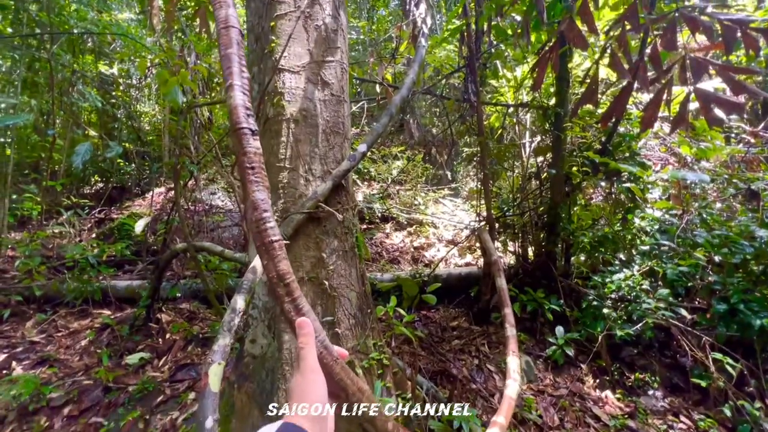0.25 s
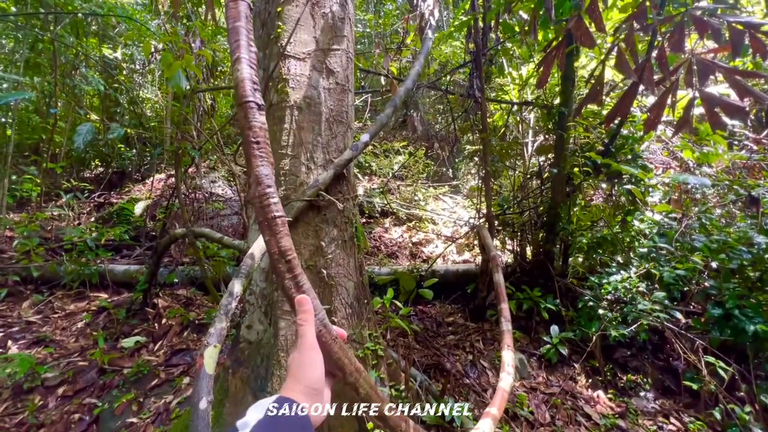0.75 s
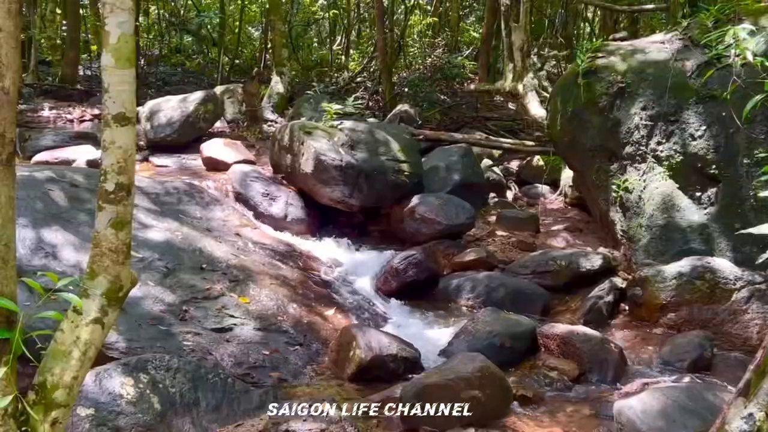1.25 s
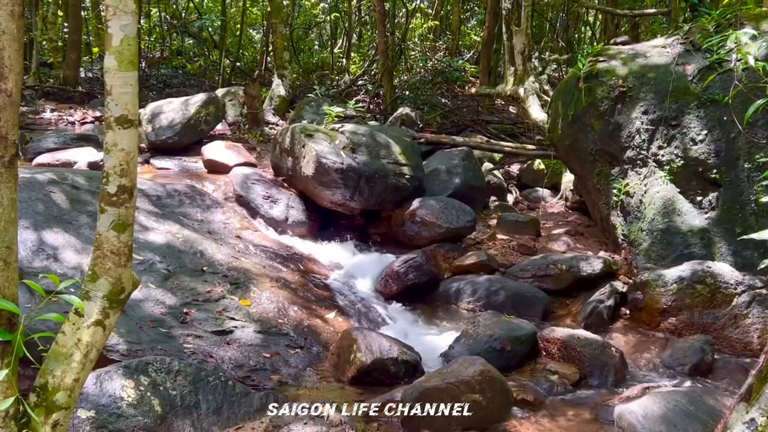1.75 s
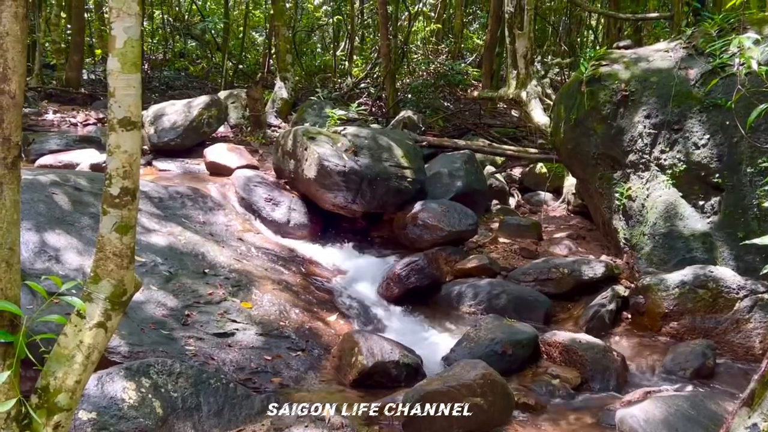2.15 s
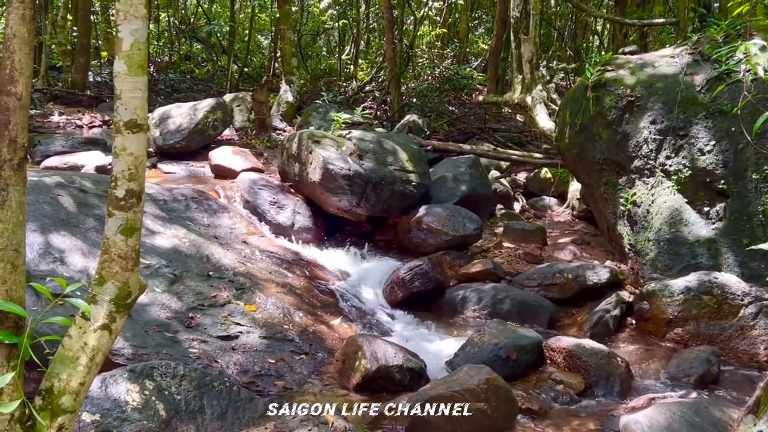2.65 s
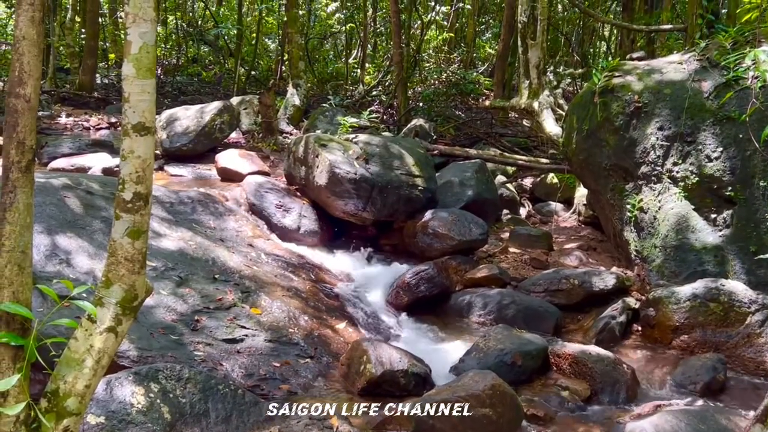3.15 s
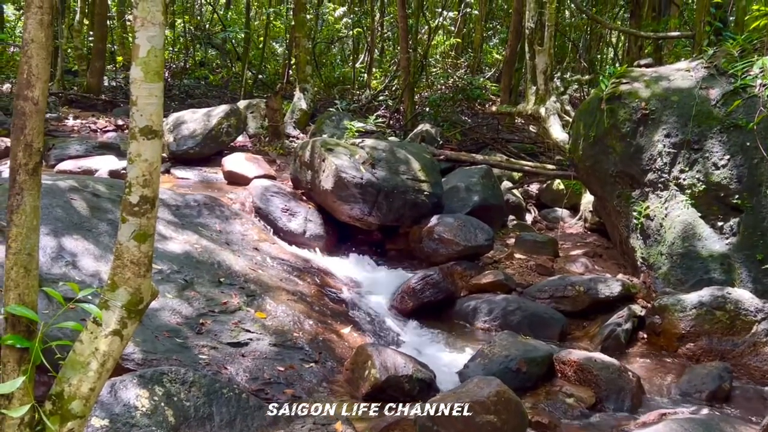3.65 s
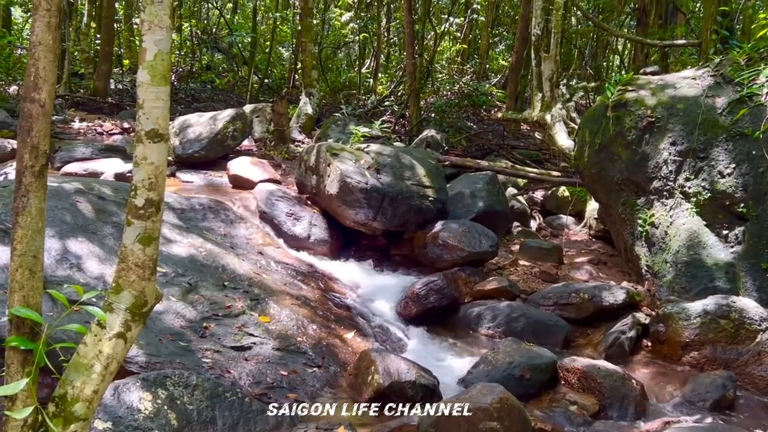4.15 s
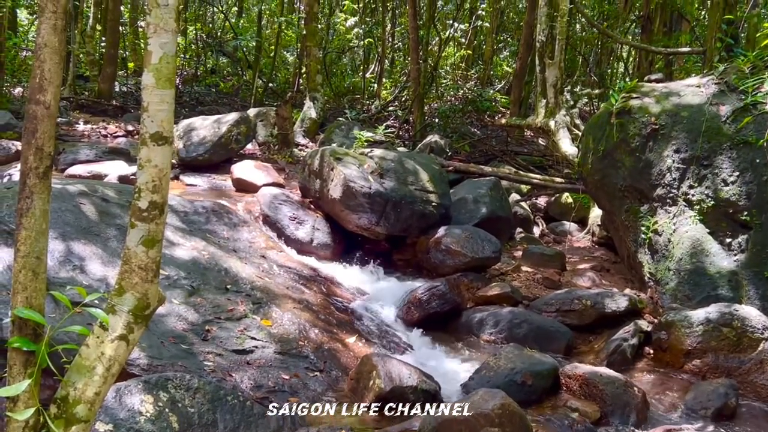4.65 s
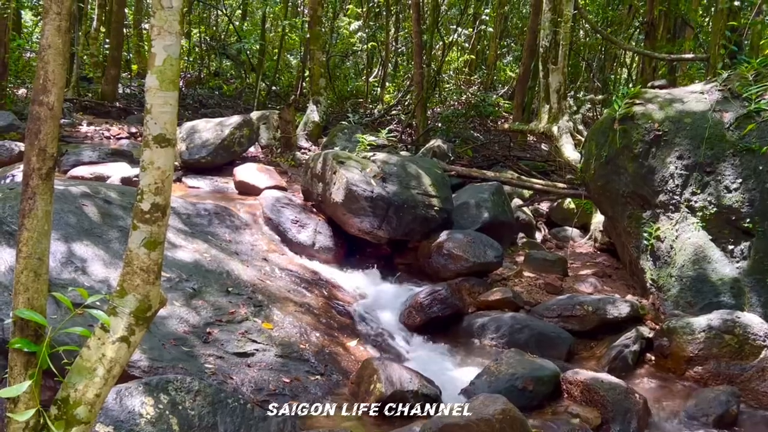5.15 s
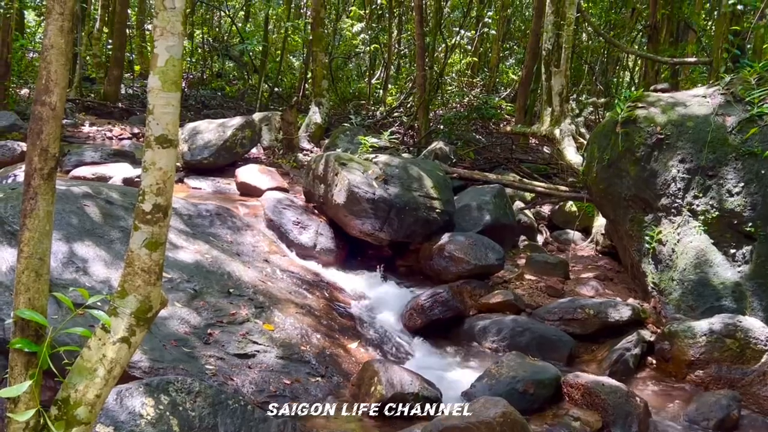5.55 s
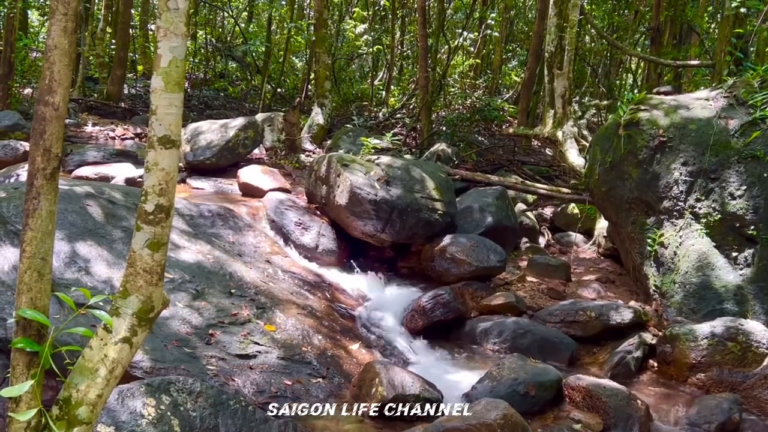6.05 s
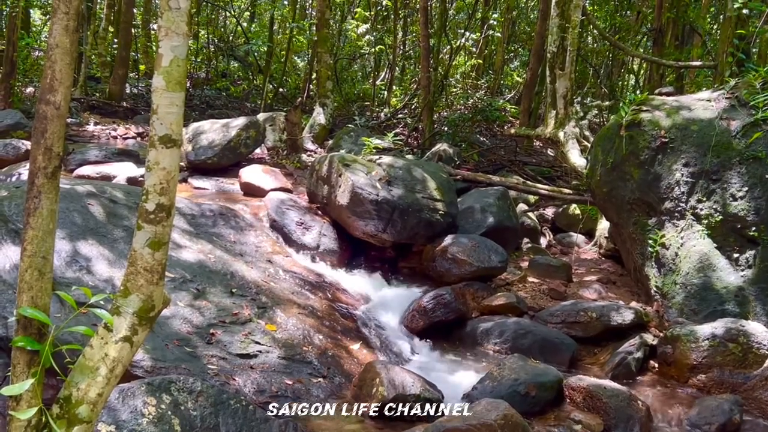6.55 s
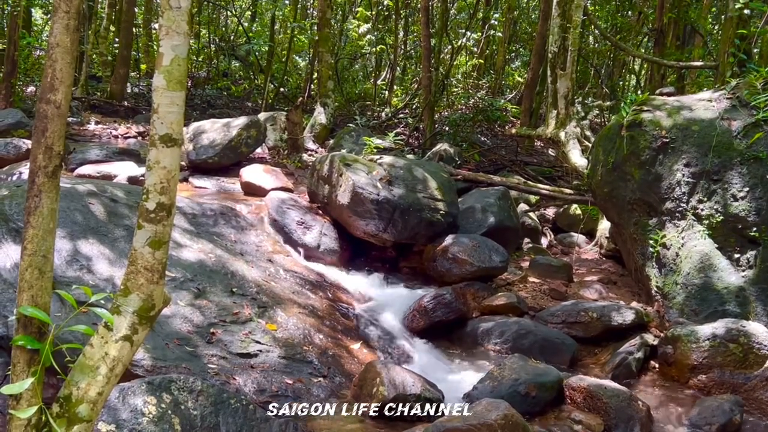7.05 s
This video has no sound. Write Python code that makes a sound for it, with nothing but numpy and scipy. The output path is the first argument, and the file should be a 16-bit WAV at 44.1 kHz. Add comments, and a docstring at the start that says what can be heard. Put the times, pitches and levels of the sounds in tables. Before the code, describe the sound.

A quiet forest opens with a soft, wide hiss of leaves and distant water and very faint, thin insect song. After about a second, a small stream comes in much louder and closer, rushing steadily over boulders with bubbling, fine spray and irregular hollow plops. Just before the end it drops away to a faint, shallow trickle between stones.

```python
"""A forest, three spots joined by short fades. First quiet trees: a hiss of leaves and far water,
thin insect song, a few faint plops. Then a small stream pours over boulders: turbulence, spray and
swarms of bubbles ring in rock hollows, and big air pockets plop above the rush.
Last, a shallow trickle tinkles through gaps between stones."""
import sys
import numpy as np
from scipy import signal
from scipy.fft import rfft, irfft, next_fast_len
from scipy.io import wavfile
from scipy.ndimage import uniform_filter1d, map_coordinates

SR = 44100
rng = np.random.default_rng(int(sys.argv[2]) if len(sys.argv) > 2 else 0)


def int16_out(signal):
    """Quantize to a 16-bit WAV file."""
    q = np.round(np.clip(np.atleast_2d(signal).T, -1, 1) * 32767)
    wavfile.write(sys.argv[1], SR, q.astype(np.int16))


N = 321018

# stereo width under the trees: f/Hz, side minus mid/dB
TREES_WIDTH = [(60, -14), (200, -7), (400, -3), (700, 2.5), (1300, 3.5), (3000, 0), (8000, -1), (15000, 4)]


def amp(db):
    """dB to gain."""
    return 10 ** (np.asarray(db) / 20)


def unit(x):
    """Scale to rms 1."""
    return x / np.sqrt(np.mean(x ** 2) + 1e-20)


def along(points, hz):
    """Interpolate (f/Hz, value) points on a log axis."""
    f, v = np.transpose(points)
    return np.interp(np.log(hz + 1), np.log(f + 1), v)


def wobble(rate_hz):
    """Smooth random curve, rate_hz knots per second."""
    knots = rng.standard_normal(int(N * rate_hz / SR) + 4)
    return map_coordinates(knots, [np.arange(N) * rate_hz / SR])


def filtered(x, response):
    """Apply response(f/Hz) by FFT."""
    size = next_fast_len(N + SR // 2)
    return irfft(rfft(x, size) * response(np.fft.rfftfreq(size, 1 / SR)), size)[..., :N]


def resonance(hz, centre_hz, width_hz):
    """One damped mode, gain 1 at its centre."""
    return 1j * hz * width_hz / (centre_hz ** 2 - hz ** 2 + 1j * hz * width_hz)


def turbulence(patchy_db):
    """Mid and side white noise sharing random gain patches in time and frequency."""
    spectra = signal.stft(rng.standard_normal((2, N)), nperseg=512)[2]
    patches = uniform_filter1d(rng.standard_normal(spectra.shape[1:]), size=7, axis=0)
    patches = uniform_filter1d(patches, size=9, axis=1)
    return unit(signal.istft(spectra * amp(patchy_db * unit(patches)), nperseg=512)[1][:, :N])


def bubble(t, hz, life_s, rise, swell):
    """A bubble swells, decays 40 dB per life and climbs in pitch as it nears the surface."""
    age = np.minimum(t / life_s, 2)
    envelope = (1 - np.exp(-(age / swell) ** 2)) * np.exp(-2 * np.log(10) * age)
    return envelope * np.sin(2 * np.pi * hz * t * (1 + rise * age / 2))


def swarm(low_hz, high_hz, cycles, spread_db, count, samples):
    """Bubbles at random times and bearings, even in energy per Hz; mid and side."""
    onset, pitch, lifespan, strength, bearing = rng.random((count, 5)).T[:, :, None]
    hz = low_hz * (high_hz / low_hz) ** pitch
    life_s = cycles * (.5 + lifespan) / hz
    gain = hz * amp(spread_db * np.minimum(-np.log(1 - strength), 4))
    rings = gain * bubble(np.arange(samples) / SR, hz, life_s, rise=0.18, swell=0.081)
    index = ((onset * N).astype(int) + np.arange(samples)).ravel()
    return np.array([unit(np.bincount(index, (rings * pan).ravel(), N)[:N])
                     for pan in (1, 2 * bearing - 1)])


def placed(mid_side, spectrum, width, hollows):
    """Colour mid and side and ring them in rock hollows; left and right at rms 1."""
    def colour(hz):
        ringing = sum(amp(db) * resonance(hz, f_hz, width_hz) for f_hz, width_hz, db in hollows)
        return amp(along(spectrum, hz)) * (1 + ringing)

    mid = filtered(mid_side[0], colour)
    side = filtered(mid_side[1], lambda hz: colour(hz) * amp(along(width, hz)))
    return unit(np.array([mid + side, mid - side]))


def forest():
    """Wide soft hiss of leaves and far water that ticks and gurgles in a hollow."""
    # leaves and far water: f/Hz, relative density/dB
    spectrum = [(25, -19), (60, 3.5), (95, 1.5), (160, -4.5), (380, -5.5), (700, -5.5), (1300, -8),
                (2300, -11), (4000, -13.5), (6500, -12.5), (8500, -17), (11000, -30), (15500, -38)]
    # distant gurgle modes: f/Hz, width/Hz, gain/dB
    hollows = [(280, 54, -0.5), (467, 28, 7)]
    ticks = amp(-19.5) * swarm(690, 2330, cycles=18, spread_db=2.5, count=700, samples=1400)
    level_db = -55.0 + 0.23 * wobble(12.1)
    return amp(level_db) * placed(turbulence(patchy_db=0.5) + ticks, spectrum, TREES_WIDTH, hollows)


def insects():
    """Distant insects, each holding a thin wavering note of narrow-band noise."""
    # one note per insect: f/Hz, width/Hz, level/dB
    notes = [(5960, 28, -73), (6295, 14, -78), (6200, 130, -81), (6662, 14, -84)]
    out = np.zeros((2, N))
    for centre_hz, width_hz, db in notes:
        note = filtered(rng.standard_normal((2, N)), lambda hz: resonance(hz, centre_hz, width_hz) ** 2)
        out += amp(db + 1.5 * wobble(3.0)) * unit(note)
    return out


def plops():
    """Big air pockets ring out singly, far and near."""
    # large bubbles: t/s, f/Hz, peak level/dB, life/s
    pockets = [(0.168, 463, -55, 0.068), (0.696, 466, -59, 0.063), (1.025, 460, -64, .07),
               (1.778, 885, -35, 0.033), (1.880, 885, -31, 0.015), (2.230, 300, -36, 0.045),
               (2.280, 1520, -37, 0.024), (2.311, 231, -34, 0.06), (2.392, 335, -36, .035),
               (2.524, 2400, -38, .018), (2.530, 503, -39, 0.027), (2.572, 233, -34.5, 0.067),
               (2.590, 1315, -37.5, 0.03), (2.705, 235, -38, 0.053), (2.716, 1630, -37, 0.024),
               (3.072, 360, -33.5, .035), (3.095, 236, -38, 0.044), (3.182, 1320, -33, 0.021),
               (3.236, 1430, -33, 0.02), (3.433, 1440, -33, .016), (3.810, 2110, -41, 0.035),
               (3.902, 1350, -33, 0.016), (3.946, 2940, -46, .022), (4.012, 607, -33, 0.047),
               (4.067, 236, -36, 0.082), (4.172, 1470, -35, .016), (4.336, 240, -36.5, 0.057),
               (4.570, 2130, -39.5, .032), (4.711, 537, -26.5, 0.024), (4.763, 240, -36, 0.058),
               (5.051, 1360, -33, .013), (5.150, 173, -37.5, .06), (5.723, 1153, -35.5, 0.025),
               (5.745, 227, -33.5, 0.08), (5.781, 1410, -38, 0.027), (5.815, 514, -35.5, 0.054),
               (6.029, 175, -36, 0.078), (6.060, 393, -32.5, 0.022), (6.078, 873, -36.5, 0.036),
               (6.515, 352, -29.5, 0.026), (6.534, 2030, -29.5, 0.017), (6.824, 626, -34, 0.03),
               (6.830, 822, -32, .016), (6.960, 473, -36, 0.033), (6.993, 224, -37.5, 0.041)]
    out, t = np.zeros(N + SR), np.arange(SR // 4) / SR
    for start_s, hz, db, life_s in pockets:
        ring = bubble(t, hz, life_s, rise=0.088, swell=0.24)
        out[round(start_s * SR):][:len(t)] += amp(db) * ring / np.abs(ring).max()
    return out[:N]


def stream():
    """White water over boulders: turbulence and four bubble swarms, surging together."""
    # churn: f/Hz, relative density/dB
    spectrum = [(25, -21), (45, -4), (62, -0.5), (100, 0.5), (200, -4), (480, -4), (900, -3), (1500, -4.5),
                (2100, -7), (3100, -12.5), (4500, -13.5), (5300, -12.5), (6500, -14.5), (8500, -15.5),
                (11300, -18.5), (13000, -24), (15500, -27.5)]
    # stereo width: f/Hz, side minus mid/dB
    width = [(60, -24), (160, -15.5), (450, -14.5), (850, -10), (1400, -13.5), (2000, -24), (3200, -8.5),
             (4000, -47), (5000, -62), (8300, -54), (9200, -34), (11200, -30.5), (12000, -7), (15000, -11)]
    # hollows between boulders: f/Hz, width/Hz, gain/dB
    hollows = [(62.5, 11, 5.5), (77, 9.3, -5.5), (172.4, 29, -1.5), (240, 23, -0.5), (318, 41, -2),
               (361, 40, -3), (418.6, 12.4, -1), (622, 88, -4.5), (880, 60, -11.5), (1180, 37, -13.5),
               (1393, 88, -10), (1760, 37, -10.5), (2040, 73, -14)]
    bed = turbulence(patchy_db=1.0)
    glugs = amp(-20.5) * swarm(170.8, 698.0, cycles=19.7, spread_db=0.5, count=800, samples=3000)
    babble = amp(-18.0) * swarm(645.0, 2387, cycles=24.0, spread_db=-0.4, count=1400, samples=1800)
    notes = amp(-23.0) * swarm(599.6, 3294, cycles=47, spread_db=1.5, count=320, samples=3600)
    spray = amp(-10.5) * swarm(2526, 13500, cycles=20.3, spread_db=2.0, count=9000, samples=300)
    level_db = -35 + 0.22 * wobble(8) + 0.41 * wobble(45)  # flow swells and splashes
    return amp(level_db) * placed(bed + glugs + babble + notes + spray, spectrum, width, hollows)


def mic_ports(stereo):
    """Two microphone ports slip out of phase, mainly in the treble; half the shift per side."""
    # port phase: f/Hz, left lead/rad
    lead = [(500, 0), (850, -.55), (1050, 0), (8800, 0), (9100, 1.5), (10150, 3.14), (11950, 6.28),
            (13750, 9.42), (15400, 12.57)]
    return filtered(stereo, lambda hz: np.exp(.5j * along(lead, hz) * np.array([[1], [-1]])))


def trickle():
    """Shallow water tinkles through gaps between stones."""
    # shallow flow: f/Hz, relative density/dB
    spectrum = [(25, -20), (70, 10), (500, 2.5), (900, 3), (1600, -3.5), (3000, -7), (4300, -8.5),
                (6300, -4), (9000, -13), (11500, -19), (15500, -20)]
    # gap modes: f/Hz, width/Hz, gain/dB
    gaps = [(700, 120, -1), (2070, 280, 6)]
    bed = turbulence(patchy_db=0.5)
    tinkles = amp(-17) * swarm(580, 2600, cycles=14, spread_db=3.0, count=1500, samples=1200)
    return amp(-55.0) * placed(bed + tinkles, spectrum, TREES_WIDTH, gaps)


def fader(start_s, cut_s, rise_s=0.18, sink_s=0.05, sink_db=-12):
    """Gain of one spot: S-curve rise, hold, short sink, cut to silence."""
    t = np.arange(N) / SR
    rise = np.sin(np.pi / 2 * np.clip((t - start_s) / rise_s, 0, 1)) ** 2
    sink = np.interp(t, [cut_s - sink_s, cut_s], [1, amp(sink_db)], right=0)
    return rise * sink


def scene():
    """Trees, cascade and shallows in turn."""
    big_bubbles = plops()
    trees = (forest() + insects() + big_bubbles) * fader(start_s=-1, cut_s=1.161, sink_s=0.06)
    cascade = (mic_ports(stream()) + big_bubbles) * fader(start_s=1.2433, cut_s=7.055)
    shallows = trickle() * fader(start_s=7.114, cut_s=8)
    return trees + cascade + shallows


def record(dry):
    """Brick-wall low-pass."""
    top_hz = 15750
    return filtered(dry, lambda hz: hz < top_hz)


dry = scene()
out = record(dry)
int16_out(out)
```